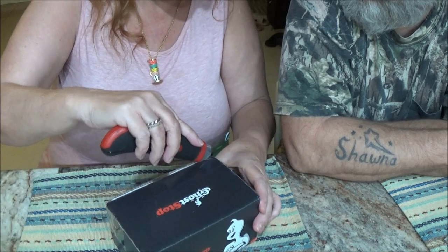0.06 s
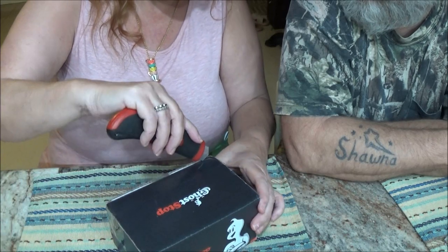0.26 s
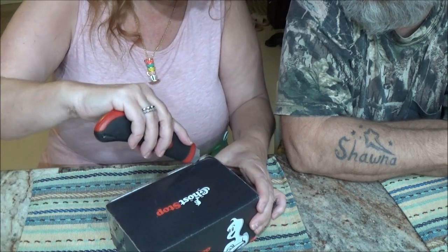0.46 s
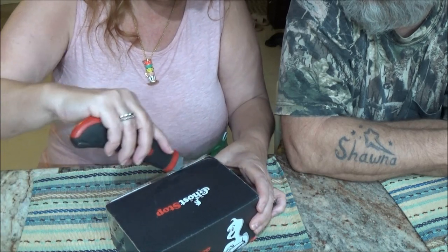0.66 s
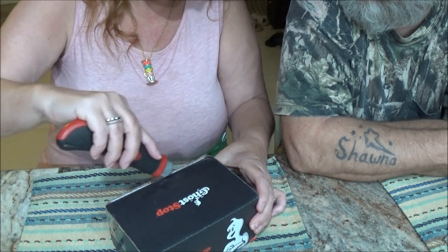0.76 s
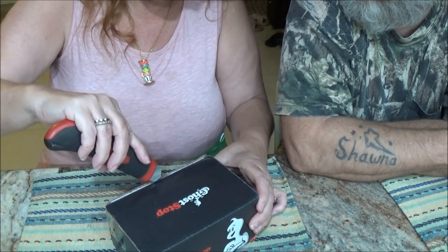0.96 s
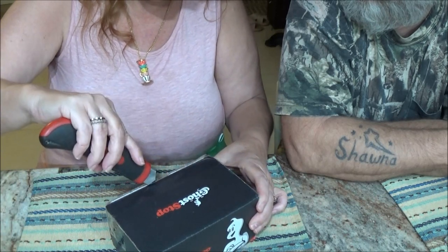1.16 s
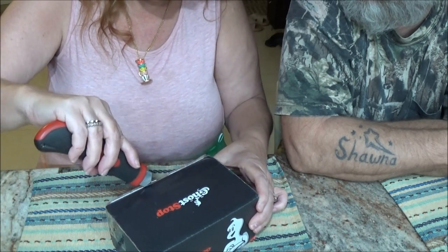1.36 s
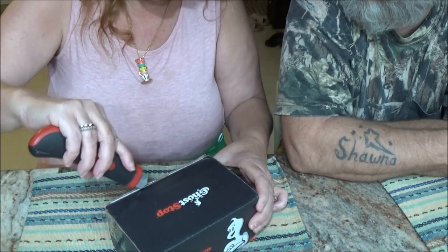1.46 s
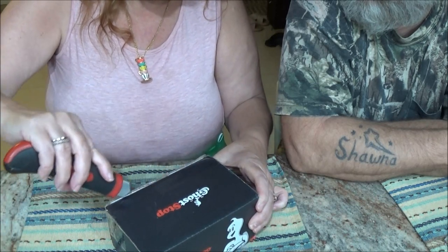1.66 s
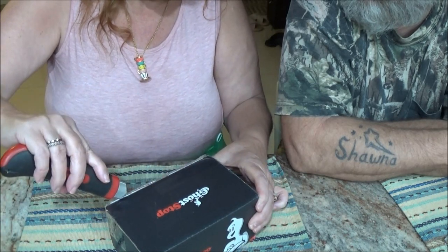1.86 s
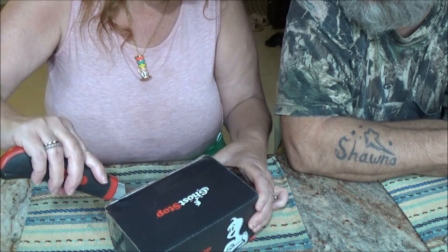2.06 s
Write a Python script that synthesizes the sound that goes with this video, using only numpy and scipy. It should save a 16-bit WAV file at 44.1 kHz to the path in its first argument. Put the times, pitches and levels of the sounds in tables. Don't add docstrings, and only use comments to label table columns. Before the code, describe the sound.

A utility knife slices packing tape on a small cardboard box: a few taps and clicks first, then gritty catching scrapes with hollow resonance, a short pause, one last rasp, close microphone in a quiet kitchen.

```python
import sys
import numpy as np
from scipy import signal
from scipy.fft import rfft, irfft, next_fast_len
from scipy.io import wavfile
from scipy.ndimage import uniform_filter1d, map_coordinates

SR = 44100
rng = np.random.default_rng(int(sys.argv[2]) if len(sys.argv) > 2 else 0)


def unload_audio(sound):
    columns = np.transpose(np.atleast_2d(sound))
    steps = np.round(np.clip(columns, -1, 1) * 32767)
    wavfile.write(sys.argv[1], SR, steps.astype(np.int16))


def volts(x):
    e = np.asarray(x, float) / 20
    return 10 ** e


N = 92610
T = np.arange(N) / SR


def unit(x):
    return x / np.sqrt(np.mean(x ** 2) + 1e-20)


def along(points, hz):
    f, v = np.transpose(points)
    return np.interp(np.log(hz + 1), np.log(f + 1), v)


def wobble(rate):
    knots = rng.standard_normal(int(N * rate / SR) + 4)
    return map_coordinates(knots, [T * rate])


def filtered(x, response):
    m = next_fast_len(N + SR // 2)
    return irfft(rfft(x, m) * response(np.fft.rfftfreq(m, 1 / SR)), m)[..., :N]


def rings(x, body):
    def response(f):
        total = 0
        for k, (centre, width, db) in enumerate(body):
            resonance = 1j * f * width / (centre ** 2 - f ** 2 + 1j * f * width)
            total = total + (-1) ** k * volts(db) * resonance
        return total
    return filtered(x, response)


def recovery():
    return volts(np.interp(T, [1.85, 2.0], [0, 2.5]))


# pitch_hz, density_db (per Hz)
KITCHEN = [(20, -11.5), (110, -6), (200, -4.5), (400, -1), (1500, -2), (5000, -7.5), (10000, -12.5),
           (16000, -15)]


def kitchen():
    noise = rng.standard_normal((2, N))
    hum = unit(filtered(noise, lambda hz: volts(along(KITCHEN, hz))))
    return volts(-54.5) * hum * recovery()


# pitch_hz, width_hz, length_s, level_db, every_second_turn_db
WHIR = [
    (9550, 200, .022, -64, 0),
    (3200, 130, .018, -63, 0),
    (2750, 300, .007, -52, -8),
]


def whir():
    turn_s, start_s = 1001 / 30000, .002
    turn, phase = np.divmod(T - start_s, turn_s)
    out = np.zeros(N)
    for hz, width, length, db, odd_db in WHIR:
        gate = np.sqrt(np.abs(np.sin(np.pi * np.clip(phase / length, 0, 1))))
        hiss = unit(rings(rng.standard_normal(N), [(hz, width, 0)]))
        rub = unit(np.sin(2 * np.pi * hz * T) + 0.52 * hiss)
        out += volts(db + odd_db * (turn % 2)) * gate * rub
    return out * recovery()


# pitch_hz, t60_s
WALLS = [(200, 0.5), (2000, 0.25), (10000, 0.09)]


def walls(x):
    hz, t, z = signal.stft(rng.standard_normal((2, SR // 2)), SR, nperseg=256)
    decay = volts(-60 * t / along(WALLS, hz)[:, None])
    tail = signal.istft(z * decay, SR, nperseg=256)[1]
    delayed = np.pad(x, (200, 0))[None]
    return signal.fftconvolve(delayed, tail / np.linalg.norm(tail[0]), axes=1)[:, :N]


# start_s, level_db, pitch_hz, t60_s
BUMPS = [(0.021, -42.5, 480, 0.026), (0.119, -28.5, 284, 0.023), (0.238, -31, 344, 0.034),
         (0.273, -26.5, 470, 0.022), (0.305, -30.5, 490, 0.032), (0.413, -26.5, 304, 0.056),
         (0.829, -50, 439, 0.024), (0.864, -19, 550, 0.032), (0.909, -22.5, 356, 0.042),
         (1.129, -21, 437, 0.015), (1.787, -18.5, 320.5, 0.057), (1.814, -29, 357, 0.085),
         (2.047, -37, 636, 0.017), (2.052, -36.5, 472, 0.056), (2.083, -42, 570, 0.061),
         (.845, -31.5, 214, 0.065), (1.72, -32, 226, 0.055), (1.65, -37, 220, 0.057)]


def bumps():
    out, t = np.zeros(N + SR), np.arange(SR // 5) / SR
    for s, db, hz, t60 in BUMPS:
        tone = np.sin(2 * np.pi * hz * t) + 0.26 * np.sin(2 * np.pi * 1.436 * hz * t)
        tone = tone * volts(-60 * t / abs(t60))
        table = .6 * (330 / hz) ** 3 * np.sin(2 * np.pi * 210 * t) * volts(-60 * t / .03)
        soft_onset = 1 - np.exp(-t / 0.0048)
        out[round(s * SR):][:len(t)] += volts(db + 5.5) * (tone + table) * soft_onset
    return out[:N]


# start_s, peak_db,
# pitch_hz, t60_s, handle_knock_db
TICKS = [(0.02, -31, 9380, 0.0092, -24), (0.1019, -21, 6600, 0.012, -19), (0.1021, -27, 11700, 0.006, -40),
         (0.1106, -33, 10400, 0.02, -12), (0.1123, -22, 8600, 0.014, -20), (0.2225, -44, 9100, 0.02, -10),
         (0.2326, -26, 6510, 0.025, -3), (0.2398, -2, 7530, 0.014, -13), (.2399, -15, 10300, .012, -30),
         (.24, -20, 3000, .012, -30), (0.2478, -28, 9100, 0.015, -25), (0.2763, -18, 3700, 0.015, -6),
         (0.2766, -26, 9350, 0.012, -30), (0.2762, -25, 6500, .01, -30), (0.3685, -30, 7000, .02, -3),
         (0.3948, -24, 6500, .02, -2), (0.4017, -18, 7900, 0.006, -12), (0.7028, -15, 4400, 0.008, -27),
         (.7029, -17, 8500, .004, -30), (0.7302, -8, 8100, 0.004, -33), (0.8428, -14, 6000, 0.012, -15),
         (0.8552, -4, 8800, 0.004, -28), (1.0728, -17, 9300, 0.006, -20), (1.7864, -15, 10200, 0.012, -8),
         (2.0045, -42, 2750, .01, -30), (2.0478, -44, 900, .006, -10), (2.0722, -44, 3000, .004, -30)]


def ticks():
    crack_t60_s, ring_t60_s = .0016, .003
    span = 1.5
    out, t = np.zeros(N + SR), np.arange(SR // 10) / SR
    for s, db, hz, t60, knock_db in TICKS:
        envelope = volts(-60 * t / crack_t60_s) + .25 * volts(-60 * t / abs(t60))
        burst = rng.standard_normal(len(t)) * envelope
        burst[0] = 3
        band = signal.butter(2, [hz / span, hz * span], "band", fs=SR)
        crack = signal.lfilter(*band, burst) + .06 * np.diff(burst, prepend=0)
        ring = np.sin(2 * np.pi * hz * t) * volts(-60 * t * hz / 7500 / ring_t60_s)
        crack = crack / np.abs(crack).max() + 1.5 * ring
        plastic = np.sin(2 * np.pi * 1450 * t) + np.sin(2 * np.pi * 1850 * t)
        knock = volts(knock_db - 60 * t / 0.009) * plastic * (1 - np.exp(-t / 0.0008))
        tick = crack / np.abs(crack).max() + knock
        out[round((s + .0006) * SR):][:len(t)] += volts(min(db, -1.2)) * tick
    return out[:N]


def fibres():
    snaps_per_s, spread_db, rub = 4000, 3.4, 1.1
    hit = rng.random(N) < snaps_per_s / SR
    size_db = spread_db * np.minimum(rng.exponential(size=N), 4)
    snaps = hit * rng.choice([-1, 1], N) * volts(size_db)
    return unit(snaps) + rub * rng.standard_normal(N)


def patchy(x):
    z = signal.stft(x, nperseg=256)[2]
    field = uniform_filter1d(rng.standard_normal(z.shape), size=4, axis=0)
    field = uniform_filter1d(field, size=14, axis=1)
    return signal.istft(z * volts(2.2 * unit(field)), nperseg=256)[1][:N]


def driven(drive, snaps, body):
    return rings(drive, body) / np.std(rings(snaps, body))


# time_s, length_s, swell_db
CATCHES = [(.707, .008, -3), (.729, .016, 9), (.751, .013, 11), (.764, .007, -4), (.771, .006, 4),
           (.786, .014, 8), (.802, .009, -4), (.813, .01, 4), (.826, .009, 11.5), (.836, .008, -4),
           (.845, .005, 4), (.858, .008, 4), (.925, .008, -6), (1.04, .03, 3), (1.13, .015, 4),
           (1.38, .015, 3), (.965, .012, 3), (1.24, .01, -4), (1.591, .006, -4), (1.612, .016, 3),
           (1.624, .007, -5), (1.648, .014, 3), (1.673, .012, 3), (1.697, .01, -4), (1.708, .012, 3),
           (1.73, .03, 6.5), (1.749, .009, -4), (1.762, .009, 4), (1.776, .007, 4), (1.783, .004, -6),
           (1.790, .012, 4.5), (.415, .008, 4), (.409, .005, -4), (1.815, .008, 2)]


def catches():
    return volts(sum(db * np.exp(-(2 * (T - at) / length) ** 2) for at, length, db in CATCHES))


# start_s, end_s, start_drag_db, end_drag_db, tilt_db (steep is bright)
STROKES = [(.02, .04, -52, -56, 5), (.098, .121, -46, -46, 5), (.243, .325, -42, -46, 0),
           (.369, .377, -33, -35, 1), (.394, .53, -32, -29, 1.5), (.53, .568, -33, -38, 1),
           (.603, .648, -46, -40, 1), (.647, .656, -35, -29, 0), (.656, .86, -27.5, -26, 1),
           (.86, .974, -26, -30, -1), (.995, 1.06, -33, -30, -2), (1.07, 1.145, -34, -30, -2),
           (1.175, 1.2, -42, -34, -2), (1.2, 1.275, -34, -35, -2), (1.328, 1.355, -43, -41, 2),
           (1.355, 1.375, -41, -34, -2), (1.375, 1.42, -34, -36, -3), (1.43, 1.46, -40, -42, 0),
           (1.46, 1.48, -42, -35, 1.5), (1.48, 1.495, -35, -38, 1.5), (1.535, 1.56, -46, -37, 2.5),
           (1.56, 1.601, -37, -31, 2), (1.601, 1.818, -29.5, -29, .3), (1.818, 1.94, -35, -51, 2),
           (1.94, 2.1, -51, -66, -3)]


def pushes():
    attack_s, release_db_per_s = .004, 750
    drags = []
    for s, end, db0, db1, _ in STROKES:
        level_db = np.interp(T, [s, end], [db0, db1]) - release_db_per_s * np.maximum(T - end, 0)
        drags.append(np.clip((T - s) / attack_s + .5, 0, 1) * volts(level_db))
    drags = np.maximum(np.array(drags), volts(-48.5) * (T > .33) * (T < 1.82))
    strongest = drags == drags.max(0)
    tilt = volts(np.transpose(STROKES)[4])[:, None]
    return [(weight * drags).sum(0, where=strongest) / strongest.sum(0) for weight in (1, tilt, 1 / tilt)]


# pitch_hz, width_hz, level_db
BOX = [(188, 18, -18), (330, 88, -1.5), (477.5, 37, 3.5), (588, 62, 2.5), (765, 173, -4.5), (1060, 173, -5),
       (1258, 34, -10.5)]


def box(dull, catch, snaps):
    lag_s, follows = .025, 0.75
    slow = np.abs(uniform_filter1d(dull * catch ** -.6, size=int(lag_s * SR) + 1))
    level = volts(-26.5 + 1.5 * wobble(30.17)) * (slow / volts(-27.5)) ** follows
    return volts(-9.5) * driven(fibres() * level, snaps, BOX)


# pitch_hz, density_db (per Hz)
TAPE = [(88, -66), (150, -7), (589, -8.5), (1420, -6), (1790, -7), (2100, -5), (5460, -11), (7770, -4),
        (16000, -23)]


def tape(flat, catch):
    tear = unit(filtered(fibres(), lambda hz: volts(along(TAPE, hz))))
    return volts(-5.5) * flat * catch ** (.9 - 1) * tear


# pitch_hz, width_hz, level_db
HANDLE = [(1727, 130, 1), (1838, 146, 1), (2322, 112, -4), (3174, 135, -7.5), (4400, 120, -10)]


def handle(dull, catch, snaps):
    return volts(-8) * driven(snaps * dull * catch ** (0.53 - 1), snaps, HANDLE)


# pitch_hz, width_hz, level_db
EDGE_NEAR = [(4714, 186, -0.5), (6350, 300, 3), (7620, 380, -3), (8260, 99, -10), (8080, 580, -2),
             (9470, 680, -2.5), (10290, 1070, -5), (12600, 1200, -19.5)]
# pitch_hz, width_hz, level_db
EDGE_FAR = [(4270, 330, -7), (5930, 390, 5), (6750, 520, 3.5), (7530, 670, 2.5), (8980, 470, 6),
            (9760, 490, 5.5), (11600, 1200, -3.5)]


def edge(bright, snaps):
    far = np.clip((T - .9) / (1.4 - .9), 0, 1)
    near_ring = driven(snaps * bright * np.sqrt(1 - far), snaps, EDGE_NEAR)
    far_ring = driven(snaps * bright * np.sqrt(far), snaps, EDGE_FAR)
    return volts(-4.5) * (near_ring + far_ring)


def cut():
    shake = volts(.4 * wobble(59.5) + 1.6 * wobble(250))
    catch = catches()
    flat, bright, dull = (shake * catch * drag for drag in pushes())
    snaps = fibres()
    knife = edge(bright, snaps) + handle(dull, catch, snaps) + tape(flat, catch)
    return patchy(knife) + patchy(box(dull, catch, snaps))


# pitch_hz, side_over_mid_db
APART = [(60, -17), (180, -69), (550, -28.5), (1650, -29), (4970, -22), (15000, -31)]


def scene():
    mic_low_hz, left_db = 139, 0.21
    near = cut() + ticks() + bumps()
    near = filtered(near, lambda hz: (1j * hz / (mic_low_hz + 1j * hz)) ** 3)
    wet = walls(near)
    hum = kitchen()
    mid = near + volts(-13.5) * wet[0] + hum[0] + whir()
    side = filtered(2.4 * wet[1] + .5 * np.roll(near, 9), lambda hz: volts(along(APART, hz)))
    side = side + volts(-2) * filtered(hum[1], lambda hz: (hz + 40) / (hz + 300))
    return np.array([volts(left_db) * mid + side, volts(-left_db) * mid - side])


def low_pass(x):
    return signal.sosfilt(signal.butter(12, 16970, fs=SR, output="sos"), x)


def record(dry):
    top_hz = 15850
    mix = filtered(dry, lambda hz: np.where(hz < top_hz, 1, volts(-45)) * (hz < top_hz + 750))
    return low_pass(mix)


dry = scene()
out = record(dry)
unload_audio(out)
```